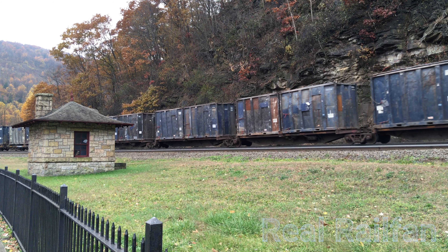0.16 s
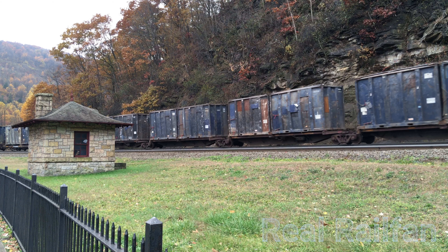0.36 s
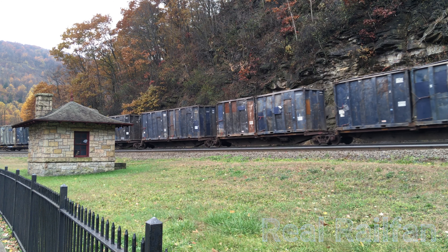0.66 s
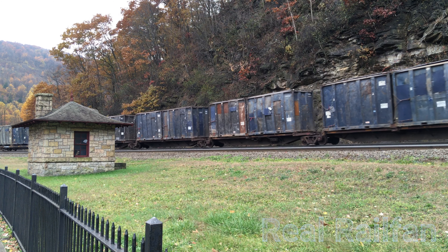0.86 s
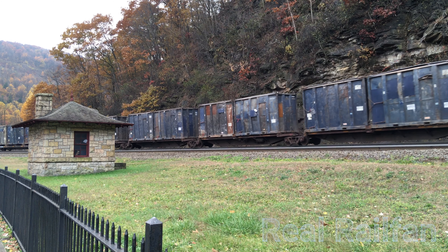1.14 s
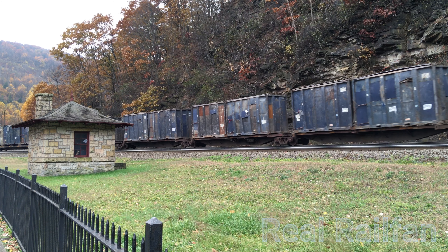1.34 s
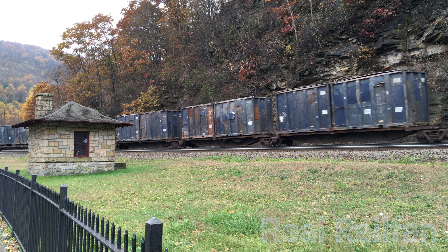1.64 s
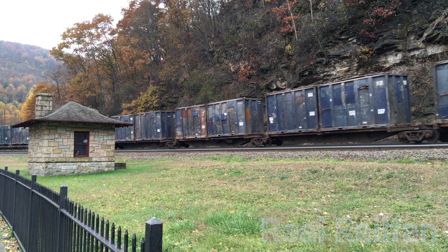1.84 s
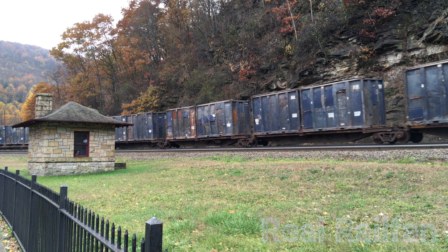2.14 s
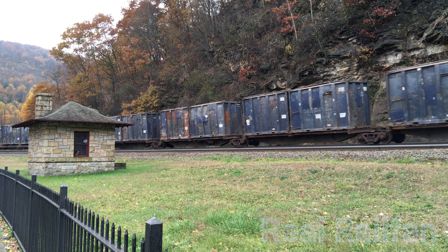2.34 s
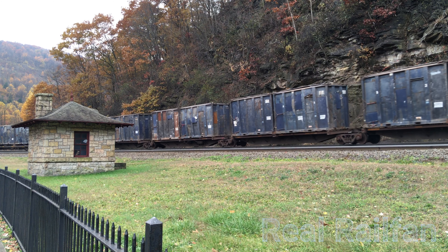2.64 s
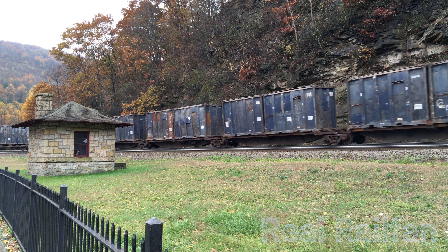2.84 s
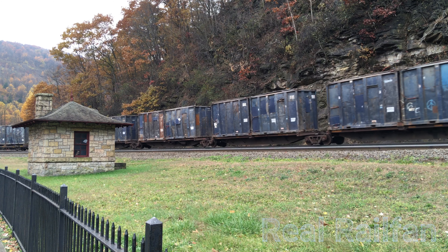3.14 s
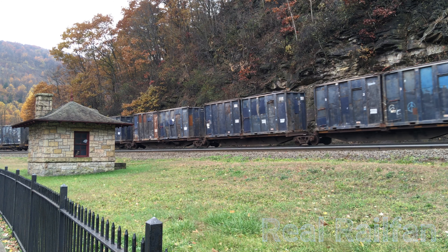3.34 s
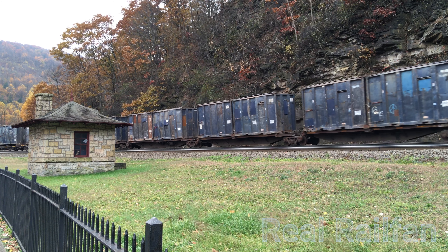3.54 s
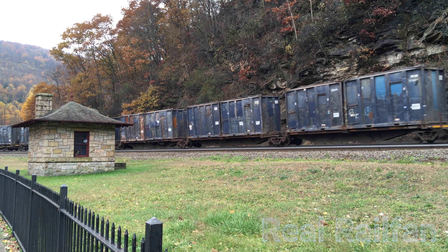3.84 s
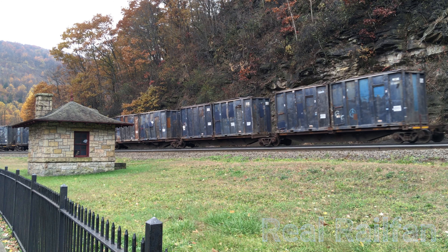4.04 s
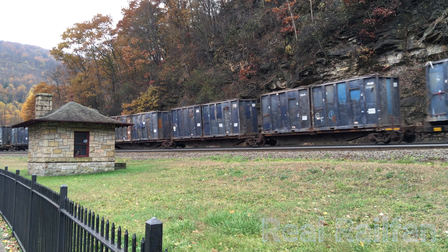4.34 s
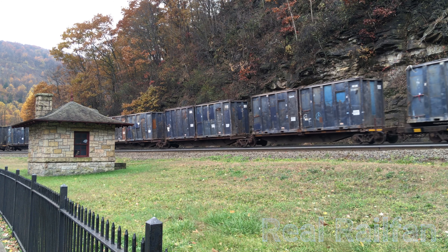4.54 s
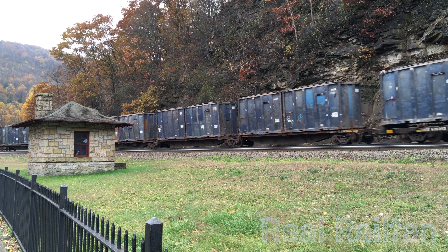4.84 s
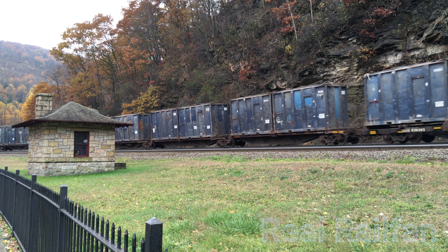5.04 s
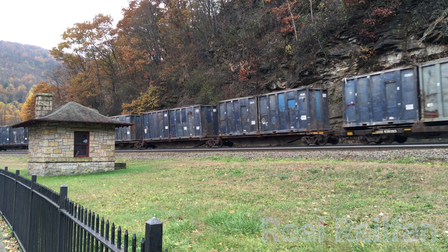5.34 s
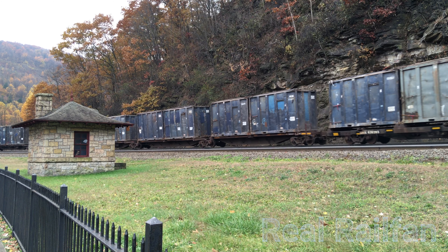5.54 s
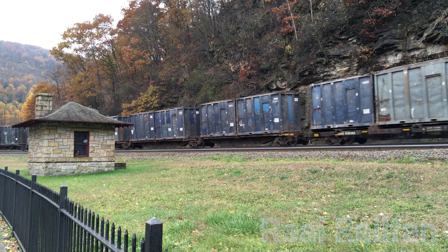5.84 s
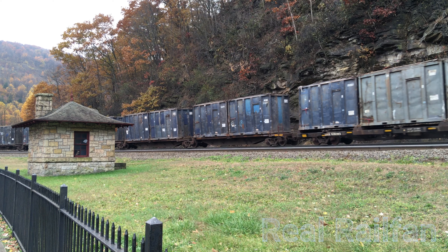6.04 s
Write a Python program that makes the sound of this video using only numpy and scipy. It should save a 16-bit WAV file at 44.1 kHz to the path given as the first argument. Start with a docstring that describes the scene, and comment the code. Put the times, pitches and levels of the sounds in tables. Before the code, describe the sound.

A slow freight train rumbles steadily past across a lawn, its wheels singing faintly while needle-thin squeals and scraping hiss flare again and again.

```python
"""Loaded freight cars roll round a tight curve below a rock face, heard from across a lawn.
Throughout, the cars rumble and jolt (shaped noise) and wheels along the curve sing in low modes (narrow
resonances). Flanges grind in bursts from 0.2 s on (noise-driven wheel modes and rasp), with ringing and short
chirps; from 0.65 s very high stick-slip squeals (wavering sines) flare up, sinking in pitch as the wheels pass.
From about 3 s the flanges brush the rail harder between bursts."""
import sys
import numpy as np
from scipy import signal
from scipy.fft import rfft, irfft, next_fast_len
from scipy.io import wavfile
from scipy.ndimage import uniform_filter1d, map_coordinates

SR = 44100
rng = np.random.default_rng(int(sys.argv[2]) if len(sys.argv) > 2 else 0)


def to_wav(sig):
    """Store sig (one row per channel, or 1-D mono) as 16-bit WAV at the path in sys.argv[1].

    Samples outside -1..1 are clipped; the rate is SR.
    """
    pcm = np.clip(np.atleast_2d(sig), -1, 1) * 32767
    pcm = np.round(pcm).astype(np.int16)
    wavfile.write(sys.argv[1], SR, pcm.T)  # frames by channels


N = 272979
FIRM_RUB_DB = -32   # reference level of rubbing for the rasp and the ringing


def from_db(db):
    """Amplitude ratio: 20 dB is a factor of ten."""
    return 10 ** (np.asarray(db) / 20)


def rms_one(x):
    """Normalisation of mean power: scale to unit rms."""
    return x / np.sqrt(np.mean(np.abs(x) ** 2) + 1e-20)


def in_time(rows):
    """Linear interpolation: each column after the time column, at every sample."""
    seconds, *columns = np.transpose(rows)
    t = np.arange(N) / SR
    return [np.interp(t, seconds, column) for column in columns]


def drift(rate):
    """Low-passed noise: a random wander of spread 1, from two equal poles at rate in Hz."""
    step = 20   # samples between computed points
    r = np.exp(-2 * np.pi * rate * step / SR)
    noise = rng.standard_normal(N // step + 4002)
    slow = signal.lfilter([1], [1, -2 * r, r * r], noise)[4000:]   # skip the filter's start-up
    return np.interp(np.arange(N) / step, np.arange(len(slow)), rms_one(slow))


def coloured(spectrum):
    """Spectral shaping: noise of rms 1 with the given (Hz, dB) curve, falling away under its lowest point."""
    hz, db = np.transpose(spectrum)
    size = next_fast_len(N)
    f = np.maximum(np.fft.rfftfreq(size, 1 / SR), 1)
    gain = from_db(np.interp(np.log(f), np.log(hz), db))
    gain = gain * np.minimum(f / hz[0], 1) ** 2
    noise = rfft(rng.standard_normal(size))
    return rms_one(irfft(noise * gain, size)[:N])


def resonate(x, hz, width):
    """A damped mode as a two-pole resonance, with gain 1 on top; width in Hz."""
    r = np.exp(-np.pi * width / SR)
    zeros = np.array([1, 0, -1]) * (1 - r * r) / 2
    poles = [1, -2 * r * np.cos(2 * np.pi * hz / SR), r * r]
    return signal.lfilter(zeros, poles, x)


def sustained(hz, width, steadiness):
    """Friction-driven resonance: a mode kept ringing, its swings in strength evened out; rms 1."""
    x = resonate(rng.standard_normal(N + SR // 2), hz, width)[-N:]   # half a second to build up
    power = np.maximum(uniform_filter1d(x * x, size=SR // 40), 1e-12)
    return rms_one(x / power ** (np.clip(steadiness, 0, 1) / 2))


def family_tone(family, steadiness):
    """Beating: close modes interfere while their joint short-time power stays near 1."""
    tones = sum(from_db(db) * sustained(hz, width, steadiness) for hz, width, db in family)
    power = uniform_filter1d(tones ** 2, size=SR // 8)
    return tones / np.sqrt(np.maximum(power, 1e-12))


def passing_by(x, doppler):
    """Doppler shift of a steady sound: an approaching wheel is heard faster."""
    return map_coordinates(x, [np.cumsum(doppler)], order=3, mode="mirror")


def swells(rows, attack_s, fall_db_per_s):
    """Attack and exponential decay: gain of (start, length, dB) events, the strongest one leading."""
    t = np.arange(N) / SR
    gains = []
    for start, length, db in rows:
        rise = np.clip((t - start) / attack_s, 0, 1)
        time_past_end = np.maximum(t - start - length, 0)
        gains.append(rise * from_db(db - fall_db_per_s * time_past_end))
    return np.max(gains, axis=0)


def flare_gains():
    """Locking of one flange: gain of the flares in each squeal mode; the highest mode has none."""
    # Each row: start in seconds, length in seconds, main mode in dB, upper mode in dB.
    flares = [(0.655, 0.05, -28, -21), (0.947, 0.049, -28, -15.5), (1.12, 0.061, -23, -20),
              (1.28, 0.2, -19, -18), (1.44, 0.07, -13.5, -18), (1.786, 0.1, -11.5, -25),
              (2.415, 0.21, -32, -17), (2.79, 0.092, -17, -20), (2.94, 0.064, -15, -18),
              (3.108, .1, -13.5, -19), (4.084, 0.053, -20, -19), (4.237, 0.076, -15, -22),
              (4.38, 0.067, -18, -19), (4.6, .11, -15, -20), (4.814, 0.18, -11.5, -22),
              (5.524, 0.039, -22, -22), (5.908, 0.074, -18.5, -24)]
    start, length, main_db, upper_db = np.transpose(flares)
    near = [swells(zip(start, length, db), attack_s=0.032, fall_db_per_s=166) for db in (main_db, upper_db)]
    return near + [0]


def squealing(pitch, waver_hz=3.3, wander_db=2.5, scatter_db=-11, flare_scatter_db=-20):
    """Stick-slip locks modes into near sines; ground and cars scatter a blurred copy, less of a near flare."""
    # Frequency of the main, upper and highest mode, as ratios to the main pitch.
    squeal_ratios = [1, 1.0237, 1.1361]
    # The many wheels in the curve together. Each row: time in seconds, then the levels
    # of the main, upper and highest mode in dB.
    chorus_levels = [(0, -35, -28, -43), (0.9, -29, -24, -44), (1.5, -19.5, -19.5, -63),
                     (2.1, -27.5, -28, -46), (2.5, -29, -18.5, -30), (3.05, -23.5, -21, -22.5),
                     (3.7, -20, -25, -26), (4.0, -22, -31, -28), (5.3, -23, -28, -29),
                     (6.19, -21, -22.5, -29)]
    out = np.zeros(N)
    for ratio, chorus_db, flare in zip(squeal_ratios, in_time(chorus_levels), flare_gains()):
        chorus = from_db(chorus_db + wander_db * drift(8.9))
        phase = 2 * np.pi * np.cumsum(ratio * pitch + waver_hz * drift(28)) / SR
        scattered_gain = np.hypot(chorus * from_db(scatter_db), flare * from_db(flare_scatter_db))
        scattered = scattered_gain * (drift(102) + 1j * drift(45))   # random amplitude and phase
        envelope = np.hypot(chorus, flare) + scattered
        out += np.sqrt(2) * np.real(envelope * np.exp(1j * phase))
    return out


def rubbing(wander_db=0.5):
    """Friction as the driving force: how hard the flanges rub, in dB, with powers added."""
    # Between rubs the flanges still brush the rail, harder under the later cars.
    # Each row: time in seconds, level in dB.
    brushing = [(0, -49.5), (0.6, -50.5), (1.3, -45), (2.15, -49.5), (2.85, -49), (3.05, -34.5),
                (4.5, -34.5), (6.19, -37)]
    # A flange presses on the rail head and grinds. Each row: start in seconds, length in seconds, level in dB.
    rubs = [(0.195, .07, -38), (0.655, 0.036, -35), (0.865, 0.3, -36), (1.3, 0.29, -33.5),
            (1.745, 0.14, -32.5), (2.37, 0.052, -34), (2.62, 0.026, -39.5), (2.74, 0.045, -42.5),
            (2.89, 0.32, -33), (3.32, 0.24, -34), (3.52, 0.17, -30.5), (3.8, 0.36, -32.5), (4.24, 0.2, -31),
            (4.55, 0.33, -32), (4.98, .38, -35.5), (5.44, 0.3, -33.5), (5.9, 0.23, -35)]
    bursts = swells(rubs, attack_s=0.027, fall_db_per_s=100)
    gain = np.hypot(from_db(in_time(brushing)[0]), bursts)
    return 20 * np.log10(gain) + wander_db * drift(18)


def grinding(grind_db, doppler, patchy_db=4.5, judder_db=0.5):
    """Friction noise excites the high wheel modes, now one, now another; the rasp grows faster than the rub."""
    # Modes of the grinding wheels. Each row: frequency in Hz, width in Hz before narrowing, relative level in dB.
    wheel_modes = [(3117, 30, -9), (3736, 32, -7), (3854, 26, -11), (4511, 25, -14), (5066, 31, -12),
                   (5259, 66, -8), (5787, 27, -11), (6045, 24, -8), (6180, 52, -5), (6315, 26, -9),
                   (7063, 45, -9), (7983, 57, -11), (8915, 32, -9), (9663, 46, -7), (9846, 30, -9),
                   (10201, 29, -12), (10524, 26, -3), (10664, 39, -6), (10815, 31, -9), (10993, 47, -6),
                   (11208, 27, -8), (11413, 47, -4), (11601, 41, -6), (11746, 20, -8), (11876, 44, -7),
                   (12048, 25, -4), (12403, 52, 0), (12516, 20, -5), (12688, 29, -4), (13049, 51, -7)]
    # Spectrum shape of the rasp between the modes. Each row: frequency in Hz, relative density in dB per Hz.
    rasp_spectrum = [(1200, -5), (2200, -0.5), (2950, -21.5), (3270, 6.5), (3450, 6), (3600, 0.5),
                     (4200, -3.5), (4800, -9), (5600, 0), (7700, -5), (9500, -0.5), (13000, 5),
                     (14300, 10.5), (15000, -29)]
    modes = np.zeros(N)
    for hz, width, db in wheel_modes:
        patchy_gain = from_db(db + patchy_db * drift(6.0))
        modes += patchy_gain * sustained(hz, width * 0.31, steadiness=0.59)   # narrowed: lighter damping
    modes = from_db(-0.5) * rms_one(passing_by(modes, doppler))
    rasp_db = 0.8 + 0.16 * (grind_db - FIRM_RUB_DB)   # on top of the rub's own level
    rasp = from_db(rasp_db) * coloured(rasp_spectrum)
    return from_db(grind_db + judder_db * drift(36)) * (modes + rasp)


def ringing_wheels(grind_db, doppler, steadiness=0.14):
    """Forced resonance: the nearest wheels ring in middle modes, the more the harder the flanges rub."""
    # Close middle modes, one list for each family. Each row: frequency in Hz, width in Hz, relative level in dB.
    ringing_modes = [
        [(2240, 27, -29), (2289, 26, -4), (2501, 45, -5), (2533, 7.8, -3.5), (2650, 7, -9.5)],
        [(4270, 17, -18), (4227, 1.3, -2), (4410, 51, 1)],
        [(5230, 35, 4), (5280, 9.1, 3)],
        [(6160, 13, -14), (6050, 5.1, 21), (6000, 16, -10)],
    ]
    # Answer of each family, lowest first. Each row: level at a firm rub in dB, wander in dB.
    ringing_response = [(-41.5, 2), (-41.5, 2.2), (-50.5, 3.5), (-51.5, 3)]
    # Dependence on the rub, same order: dB of ring per dB of rub.
    ringing_follows = [.3, .8, 1.1, .9]
    out = np.zeros(N)
    for (db, wander_db), follows, family in zip(ringing_response, ringing_follows, ringing_modes):
        level_db = db + follows * (grind_db - FIRM_RUB_DB) + wander_db * drift(7.7)
        out += from_db(level_db) * passing_by(family_tone(family, steadiness), doppler)
    return out


def chirping(waver_hz=5.04, flutter_db=1.5):
    """Brief self-excited oscillation: a single mode of a near wheel breaks into a nearly pure squeal."""
    # Each row: start in seconds, length in seconds, pitch in Hz, level in dB.
    chirps = [(0.213, 0.07, 4400, -54), (0.652, 0.045, 6153, -39), (0.688, 0.074, 2562, -39),
              (1.018, 0.11, 6245, -45), (1.35, 0.047, 2230, -39), (1.386, 0.039, 4382, -34),
              (1.47, 0.21, 4382, -41.5), (1.817, 0.12, 5330, -44.5), (3.046, 0.071, 4366, -31.5),
              (4.02, 0.065, 2530, -32), (4.253, 0.059, 6212, -36), (4.75, 0.08, 6190, -35.5)]
    out = np.zeros(N)
    for start, length, hz, db in chirps:
        gain = swells([(start, length, db)], attack_s=0.032, fall_db_per_s=138)
        gain = gain * from_db(flutter_db * drift(36))
        phase = 2 * np.pi * np.cumsum(hz + waver_hz * drift(31.6)) / SR
        out += gain * np.sqrt(2) * np.sin(phase)
    return out


def singing_wheels(wander_db=1.78):
    """Lateral creep: wheels farther along the curve slip sideways and sing at a steady pitch."""
    # Wheels of slightly different wear, one list for each family.
    # Each row: frequency in Hz, width in Hz, relative level in dB.
    singing_modes = [
        [(919.7, 13, 2.5), (941, 7.3, 3.5)],
        [(1054, 5.3, 0), (1068, 7.4, -2.5), (1083, 3.3, 5)],
        [(1629, 3.6, -4.5), (1638, 42, -9.5), (1668.6, 4.9, 1.5)],
        [(3410, 17, -3), (3345, 8.9, 13)],
    ]
    # How hard each family sings, lowest first. Each row: time in seconds, level in dB before the trim.
    singing_levels = [
        [(0, -54), (1.95, -53), (2.2, -44), (3.3, -48.5), (4.4, -39), (5.4, -45), (6.19, -43)],
        [(0, -40), (1.1, -38.5), (1.8, -46.5), (2.9, -40.5), (4.3, -46.5), (6.19, -44)],
        [(0.0, -31.5), (0.53, -38.5), (0.96, -31), (1.36, -41.5), (1.38, -36), (3.48, -36.5), (3.53, -39.5),
         (4.0, -28.5), (4.21, -36), (4.95, -33.5), (5.07, -27.5), (5.27, -39.5), (5.45, -32), (5.52, -42.5),
         (5.9, -26.5), (6.0, -36), (6.05, -27.5), (6.19, -37)],
        [(0, -47.5), (0.7, -40.5), (1.5, -49), (2.4, -41), (2.7, -47.5), (3.5, -40.5), (4.7, -41.5),
         (5.3, -35.5), (5.53, -29), (6.0, -35), (6.19, -32)],
    ]
    trims_db = [-0.24, 0.79, 0.23, -0.032]
    out = np.zeros(N)
    for level, trim_db, family in zip(singing_levels, trims_db, singing_modes):
        level_db = in_time(level)[0] + trim_db + wander_db * drift(6.8)
        out += from_db(level_db) * family_tone(family, steadiness=0.39)
    return out


def rolling(flutter_db=1.5):
    """Roughness excitation: rough wheels on rough rail shake the car bodies and make the track roar."""
    # Each row: time in seconds, car body rumble in dB, rail roar in dB before a common lift.
    rolling_levels = [(0, -22.5, -44.5), (0.8, -22, -44), (1.8, -25, -47), (2.6, -23.8, -46.5),
                      (3.5, -23, -45.5), (4.2, -23.5, -42.5), (5.1, -22, -43), (6.19, -21, -42)]
    # Spectrum shape of the car body rumble. Each row: frequency in Hz, relative density in dB per Hz.
    rumble_spectrum = [(22, -40), (31, -17), (40, -20.5), (50, -1.5), (64, -2.5), (78, -0.5), (93, 3),
                       (120, -3.5), (180, -9), (250, -20), (360, -24), (500, -35), (800, -85)]
    # Spectrum shape of the rail roar. Each row: frequency in Hz, relative density in dB per Hz.
    roar_spectrum = [(200, 6.5), (450, -1.5), (600, 2), (800, -3.5), (1300, -4), (2000, -5.5), (3000, -4.5),
                     (4200, -8.5), (6000, -15), (9000, -18), (15000, -31)]
    # A car body jolts and the rumble surges. Each row: start in seconds, length in seconds, level in dB.
    jolts = [(0.19, 0.057, -23.5), (0.54, 0.028, -24), (2.29, 0.071, -22.5), (3.61, 0.036, -19),
             (4.0, 0.056, -21), (4.36, 0.029, -20), (4.55, .09, -20.5), (4.86, 0.056, -22),
             (5.45, 0.12, -25), (5.88, 0.046, -19.5), (6.06, 0.05, -23)]
    rumble_db, roar_db = in_time(rolling_levels)
    shake = coloured(rumble_spectrum)
    shake /= np.sqrt(uniform_filter1d(shake ** 2, SR // 4))   # many axles share the load, so it stays even
    surges = swells(jolts, attack_s=0.017, fall_db_per_s=159)
    rumble = np.hypot(from_db(rumble_db), surges) * shake
    roar = from_db(roar_db + 5.5 + flutter_db * drift(37)) * coloured(roar_spectrum)
    return rumble + roar


def rock_face(x):
    """Specular reflection: the direct sound and a few faint late echoes."""
    # Each row: delay in seconds, level in dB relative to the direct sound.
    echoes = [(0.044, -21), (.071, -18), (.118, -35)]
    return x + sum(from_db(db) * np.pad(x, (int(delay * SR), 0))[:N] for delay, db in echoes)


def scene():
    """Superposition: the whole train, in mono."""
    # The passing wheel's main squeal. Each row: time in seconds, pitch in Hz.
    passing = [(0, 13990), (0.6, 13963), (1.37, 13922), (2.15, 13873), (3.3, 13816), (4.1, 13771),
               (4.9, 13740), (5.65, 13714), (6.19, 13700)]
    pitch, = in_time(passing)
    doppler = pitch / pitch[-1]   # modes are listed as heard at the end of the pass
    grind_db = rubbing()
    flanges = squealing(pitch) + rock_face(grinding(grind_db, doppler))
    flanges += ringing_wheels(grind_db, doppler) + chirping()
    return (flanges + singing_wheels() + rolling())[None]


def record(dry):
    """Elliptic low-pass filtering: the treble is cut steeply above 15790 Hz."""
    low_pass = signal.ellip(12, 0.1, 90, 15790, fs=SR, output="sos")   # order, ripple dB, stop-band dB, Hz
    return signal.sosfilt(low_pass, dry)


dry = scene()
out = record(dry)
to_wav(out)
```